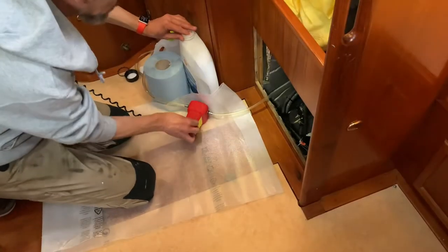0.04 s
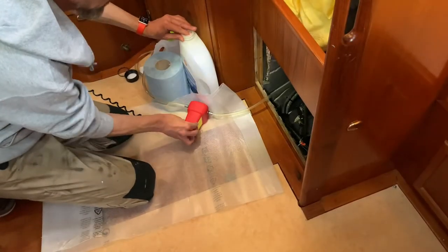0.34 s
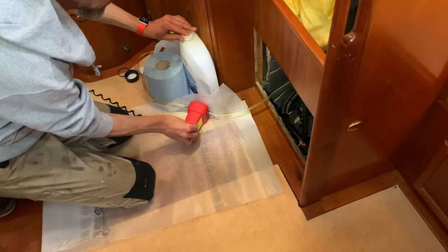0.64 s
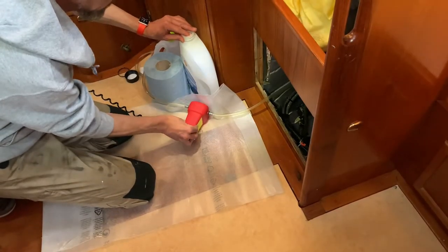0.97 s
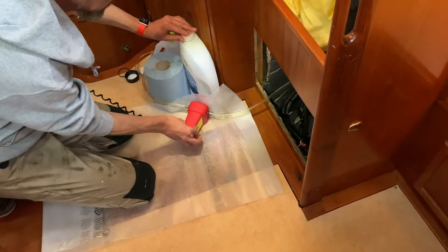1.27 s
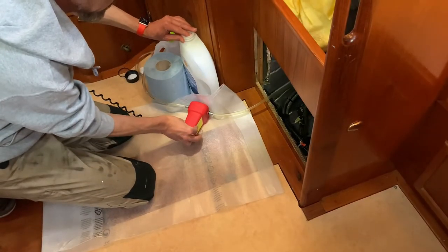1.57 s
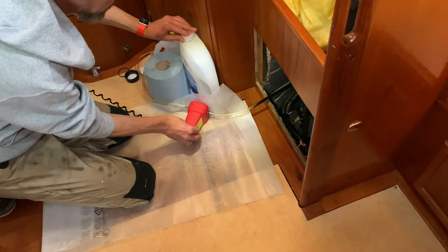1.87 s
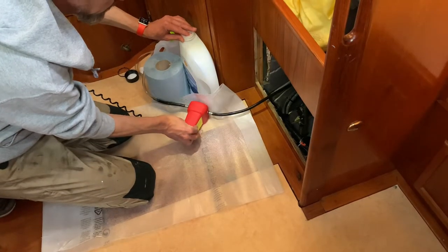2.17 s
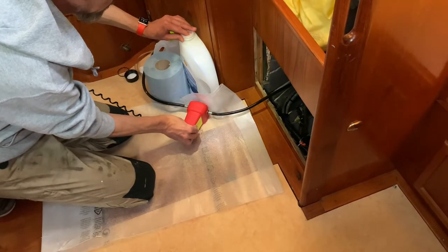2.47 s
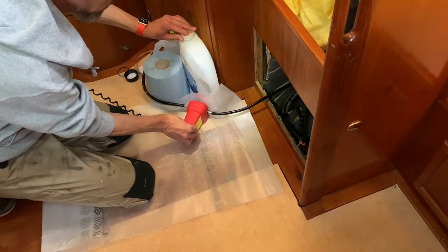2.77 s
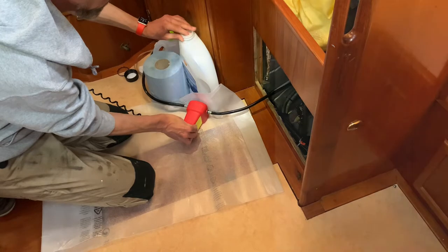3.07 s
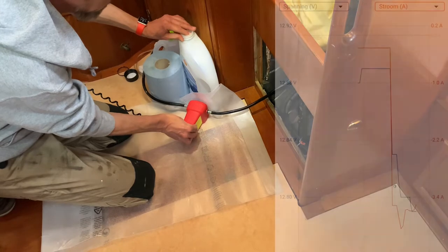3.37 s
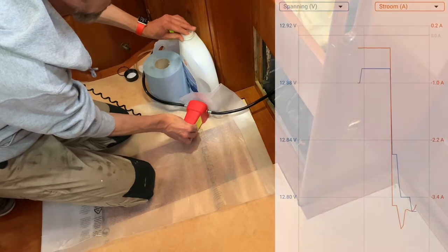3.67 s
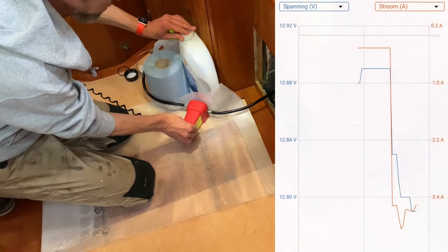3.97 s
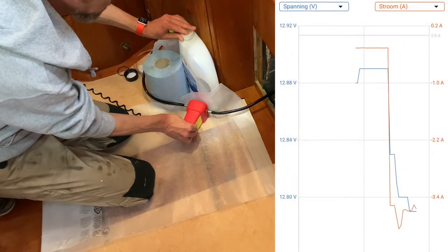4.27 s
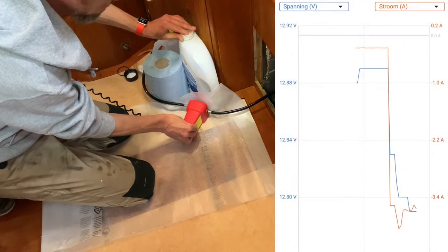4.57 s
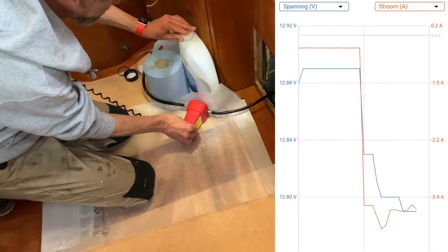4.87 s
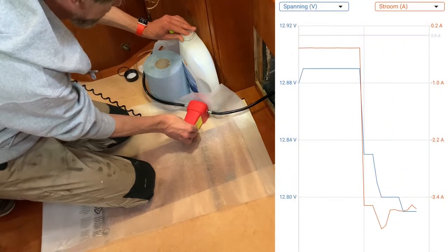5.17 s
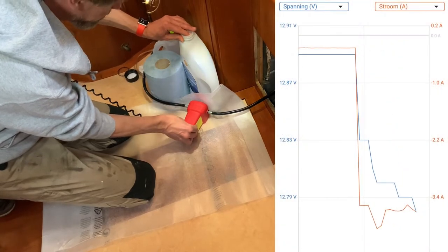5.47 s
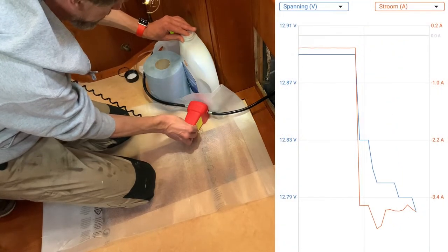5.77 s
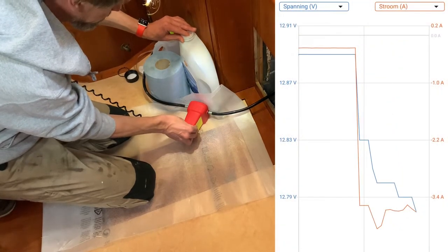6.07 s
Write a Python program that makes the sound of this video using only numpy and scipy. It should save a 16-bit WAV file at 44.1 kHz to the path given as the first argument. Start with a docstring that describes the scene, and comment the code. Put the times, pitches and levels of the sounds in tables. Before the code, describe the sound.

A small geared pump is heard from about a metre away in a quiet wooden boat cabin. It clicks on and buzzes dry for a second, then catches oil, spitting and hissing as it slows to a lower note. The foam gradually clears and the last air gurgles out of the tube, leaving a steady, pulsing hum with whining, rattling gears over a faint low hull rumble.

```python
"""A small geared oil pump, about a metre from a phone's two microphone ports in a boat's wooden cabin.
Switched on, it spins up and buzzes dry for a second, then gulps its first oil: the speed sags, and
three strokes a turn thud into the tube, ring the casing and squirt a foam that slowly clears.
The gears whine and clatter throughout. Behind them lie a low hull rumble and quiet cabin air."""
import sys
import numpy as np
from scipy import signal
from scipy.fft import rfft, irfft
from scipy.io import wavfile
from scipy.ndimage import uniform_filter1d

SR = 44100
rng = np.random.default_rng(int(sys.argv[2]) if len(sys.argv) > 2 else 0)


def wrap_up_sound(samples):
    """Save the sound to the file named by the first command line argument, as 16-bit audio."""
    columns = np.atleast_2d(samples).T
    # keep every value between -1 and 1, then stretch to whole-number steps
    tamed = np.clip(columns, -1, 1)
    steps = np.round(tamed * 32767).astype(np.int16)
    wavfile.write(sys.argv[1], SR, steps)


N = 270333
TIME = np.arange(N) / SR
BINS = np.arange(N // 2 + 1) * SR / N
ON_S, PRIMED_S, TUBE_FULL_S, THROB_S = 1.119, 2.054, 3.06, 5.14
FILL_S, FOAM_CLEAR_S = 0.4, 0.46
STROKES_PER_TURN, WHEEL_TEETH, PINION_TEETH = 3, 50, 12
KNOCK_LAG = 1.2  # a knock arrives treble first: group delay at harmonic k is KNOCK_LAG / k strokes


def pump(strokes, hz):
    """The strokes buzz while dry, then thud, ring and churn in oil; late on they soften and throb."""
    primed, throbbing = ramp(PRIMED_S - .02, 0.011), ramp(THROB_S, 0.033)
    air_left = 1 - primed + 0.2 * primed * (1 - ramp(2.85, 0.28))
    gurgle = swell(3.12, 0.34)  # the last air leaves the tube
    uneven = undb(1.3 * gurgle * walk(110))
    knocks = thuds(strokes, hz) * undb(-2 * throbbing) + casing_ring(strokes, hz, gurgle)
    wet = uneven * knocks + churn(strokes, gurgle) + growl(strokes) * throbbing
    return dry_buzz(strokes) * air_left - wet * primed - tube(strokes)


# Running speed, sagging under the oil. Each row: time in seconds, strokes a second.
RUNNING_SPEED = [(1.3, 116.4), (1.75, 118.8), (2.33, 119.8), (2.62, 107.9), (2.83, 100.8), (3.1, 100.7),
                 (3.45, 99.1), (3.8, 101.8), (4.45, 102.5), (4.95, 104.2), (6.13, 106.6)]

def stroke_rate():
    """The motor runs up from rest; the first slug of oil brakes it faster than it recovers."""
    since_gulp = TIME - 2.065
    brake_hz = 9.5 * np.exp(-np.abs(since_gulp) / np.where(since_gulp < 0, .03, .06))
    return curve(RUNNING_SPEED) * (1 - settle(ON_S, .026)) - brake_hz


# The empty pump's hollow tone. Each row: multiple of the stroke rate, relative level in dB.
BUZZ_HARMONICS = [(3, -15), (4, -13), (5, -1.5), (7, -14), (8, -1.5), (10, -1), (11, -5), (13, -7.5),
                  (14, -11)]

def dry_buzz(strokes):
    """With no oil to cushion it the rotor shakes; the buzz swells, then holds."""
    buzz = unit(partials(strokes + .002 * walk(150), BUZZ_HARMONICS, waver_db=.8, waver_hz=40))
    wobble = 1 + .1 * np.cos(2 * np.pi * strokes / STROKES_PER_TURN)
    return buzz * wobble * undb(-25.3 - 16 * np.maximum(1.83 - TIME, 0))


# Spells where the thud swells and the casing ring rises or fades.
# Each row: middle and half length in seconds, change of thud and change of ring in dB.
KNOCK_SWELLS_AND_DIPS = [(2.74, 0.17, 0, -3.5), (2.995, 0.12, 5.5, 0.5), (3.307, 0.125, 10, 0.5),
                         (3.688, 0.041, 2.5, -7), (4.52, 0.34, 4, 1.5)]

def knock_changes_db():
    """Brief, smooth changes in the level of the thud and of the casing ring."""
    return sum(np.outer([thud, ring], swell(s, length))
               for s, length, thud, ring in KNOCK_SWELLS_AND_DIPS)


# The loaded stroke's low end. Each row: multiple of the stroke rate, relative level in dB.
THUD_HARMONICS = [(3, 0), (4, -1)]

def thuds(strokes, hz):
    """Low harmonics of the strokes, each booming where it meets the floorboards' resonance."""
    board_hz, board_width_hz = 407.7, 18
    change_db, _ = knock_changes_db()
    out = 0
    for k, db in THUD_HARMONICS:
        boom_db = 8.5 / (1 + ((k * hz - board_hz) / (board_width_hz / 2)) ** 2)
        dip_db = -18 * swell(3.54, 0.035) * (k == 4)  # the upper harmonic dips briefly
        tone = partials(strokes, [(k, db - 3)], waver_db=.8, waver_hz=7, scatter=.15, lag=KNOCK_LAG)
        out += tone * undb(boom_db + dip_db)
    return out * undb(flow_db(clear_db=-35.5, foam_db=3.9, empty_cut_db=21) + change_db)


# The casing's resonances. Each row: centre in Hz, width in Hz, relative level in dB.
CASING_MODES = [(540, 36, 5), (611, 18, 0.5), (715, 70, 1.5), (844, 34, -2), (924.5, 15, 3), (954, 11, 5),
                (993, 15, -0.5), (1280, 34, -2)]

def casing_ring(strokes, hz, gurgle):
    """Each stroke knocks the casing; its harmonics swell and fade as they cross the modes."""
    staggered = strokes + (.002 + .004 * gurgle + .008 * foam()) * walk(90)
    lift = 1 + 0.057 * foam() * (1 - ramp(2.65, .2))  # foam is lighter than oil, so the modes rise
    ring = 0
    for k in range(5, 14):
        gain = sum(undb(db) / (1 + 2j * (k * hz - mode * lift) / width)
                   for mode, width, db in CASING_MODES)
        phase = 2 * np.pi * (k * staggered - KNOCK_LAG * np.log(k)) + .2 * walk(3)
        waver_db = 1.5 * walk(8) + 3.5 * foam() * np.tanh(walk(35))
        ring += np.real(gain * np.exp(1j * phase)) * undb(waver_db)
    _, change_db = knock_changes_db()
    level_db = flow_db(clear_db=-33, foam_db=3.5, empty_cut_db=5) - 2 * ramp(THROB_S - .2, .3)
    return unit(ring) * undb(level_db + change_db)


# Oil churning in the pump. Each row: frequency in Hz, relative noise density in dB.
CHURN_SPECTRUM = [(90, -41), (170, -14), (250, -4.5), (370, 4.5), (700, 4), (1000, 9), (1400, -51),
                  (3000, -54)]

def churn(strokes, gurgle):
    """Each stroke sloshes the oil, louder while it gurgles."""
    slosh = noise(0.036) * burst(strokes, decay=0.33, floor=0.12, scatter_db=4)
    level_db = flow_db(clear_db=-42, foam_db=2.5, empty_cut_db=1.7) + 7.7 * gurgle
    return colour(slosh, CHURN_SPECTRUM) * undb(level_db)


# The throb's tones. Each row: multiple of the pattern's rate, level in dB.
GROWL_HARMONICS = [(3, -55), (9, -54), (16, -53), (19, -44), (20, -49), (22, -45), (23, -47), (36, -51)]

def growl(strokes):
    """The strokes repeat in a pattern of six, which puts a low growl between their harmonics."""
    return partials(strokes / 6, GROWL_HARMONICS, waver_db=1, waver_hz=8)


# The first gulps shake the tube. Each row: middle and half length in seconds, level in dB.
OIL_GULPS = [(2.13, 0.12, -41), (2.326, 0.071, -36), (2.612, 0.078, -46)]

def tube(strokes):
    """The tube pulses with the strokes; its octave hoots while empty, then surges and settles once full."""
    gulps = sum(undb(db) * swell(s, length) for s, length, db in OIL_GULPS)
    hoot = undb(-29 - 36.5 * np.maximum(1.795 - TIME, 0)) * (1 - ramp(PRIMED_S - .05, 0.12))
    full = undb(-46 + 17.5 * settle(TUBE_FULL_S, 0.5)) * ramp(TUBE_FULL_S - .02, 0.15)
    pulse = np.cos(2 * np.pi * strokes) * (undb(-49) + gulps + 0.096 * (hoot + full))
    octave = np.cos(2 * np.pi * (2 * strokes - KNOCK_LAG * np.log(2)))
    return np.sqrt(2) * (pulse + octave * (hoot + undb(-43.5) * foam() + full))


def foam():
    """Air in the oil, 0-1: it builds while the pump fills, then clears."""
    return ramp(PRIMED_S, FILL_S) * settle(PRIMED_S + FILL_S, FOAM_CLEAR_S)


def flow_db(clear_db, foam_db, empty_cut_db):
    """Level of a sound the oil drives: raised by foam, cut until the pump fills."""
    return clear_db + foam_db * foam() - empty_cut_db * (1 - ramp(PRIMED_S, FILL_S))


def gearbox(strokes):
    """The motor's pinion drives the pump wheel; the teeth knock about when the speed changes quickly."""
    wheel = strokes / STROKES_PER_TURN
    acceleration = uniform_filter1d(np.gradient(np.gradient(strokes)), size=1500) * SR ** 2
    play = 0.000081 + 0.00075 * np.tanh(np.abs(acceleration) / 130)
    catching = settle(ON_S + .03, .07)  # the teeth skip until the motor is up to speed
    teeth = wheel + play * walk(220) + .003 * catching ** 2 * walk(400)
    loaded = ramp(2.54, 0.26)
    unoiled = ramp(ON_S + .02, .08) * (1 - ramp(1.95, .4))
    mesh = whine(teeth, wheel, catching, loaded) + strain(teeth) * loaded
    friction = (squeal(teeth, wheel) + rasp(strokes)) * unoiled
    return mesh + friction + clatter(strokes, wheel, unoiled) + motor_hum(wheel, unoiled)


# The mesh tone and its sidebands. Each row: multiple of the wheel rate, relative level in dB.
MESH_TONES = [(47, -21), (48, -22), (50, 0)]
# The whine's rise and fall. Each row: time in seconds, relative level in dB.
WHINE_LEVEL = [(1.14, -28), (1.2, -24.5), (1.46, -33), (1.8, -26.5), (2.52, -32), (2.76, -27),
               (2.85, -21.5), (3.5, -28), (3.72, -25), (3.82, -39), (4.02, -38), (4.08, -32), (4.35, -33.5),
               (4.45, -30), (4.7, -30.5), (5.25, -37.5), (5.78, -30), (6.1, -37)]

def whine(teeth, wheel, catching, loaded):
    """Meshing teeth whine; they stutter once a turn at first and flutter until the load holds them."""
    slack = (1 - loaded) * (1 - .35 * swell(1.82, .2))
    flutter = undb(slack * (4.2 * np.tanh(walk(150)) - 1.2))
    stutter = 1 + .7 * catching * np.cos(2 * np.pi * wheel)
    mesh = unit(partials(teeth, MESH_TONES, waver_db=.7, waver_hz=50))
    return mesh * flutter * stutter * undb(curve(WHINE_LEVEL) - 0.43)


# The gears under load. Each row: multiple of the wheel rate, relative level in dB.
STRAIN_TONES = [(45, -52), (47, -52), (64, -50), (65, -42.5), (66, -51), (100, -48)]

def strain(teeth):
    """Loaded gears add a whine that swells with the thud."""
    thud_db, _ = knock_changes_db()
    tones = partials(teeth + .0018 * walk(160), STRAIN_TONES, waver_db=1.8, waver_hz=90)
    return tones * undb(1.5 + 0.5 * thud_db + 1.6 * walk(9))


# The gears without oil. Each row: multiple of the wheel rate, relative level in dB.
SQUEAL_TONES = [(31, -41), (49, -47), (52, -47), (59, -44), (100, -40), (133, -45), (150, -42)]

def squeal(teeth, wheel):
    """Dry teeth squeal in an uneven flutter."""
    tones = partials(teeth + .001 * walk(330), SQUEAL_TONES, waver_db=2.5, waver_hz=90)
    each_turn = 1 + .4 * np.cos(2 * np.pi * wheel + .8 * walk(30))
    return tones * each_turn * undb(4 * np.tanh(walk(130)))


# Dry teeth rubbing. Each row: frequency in Hz, relative noise density in dB.
RASP_SPECTRUM = [(600, 1.5), (1100, 4), (2400, 4), (3200, -2), (4800, -2), (6000, -6), (7200, -9.5),
                 (8500, -37), (15000, -28)]

def rasp(strokes):
    """Dry teeth rasp at every stroke."""
    scrapes = noise(.5) * burst(strokes, decay=.5, floor=.5, scatter_db=6)
    return colour(scrapes, RASP_SPECTRUM) * undb(-36.5)


# Gear clatter from a metre off. Each row: frequency in Hz, relative noise density in dB.
CLATTER_SPECTRUM = [(30, -50), (100, -16.5), (300, 0), (600, 2), (1050, -6.5), (1250, 4), (1420, -18),
                    (1640, 4.5), (1850, 1.5), (2200, 0.5), (4500, -10), (6000, -13), (7000, -86),
                    (9500, -9), (15500, -26)]

def clatter(strokes, wheel, unoiled):
    """The same worn flanks come round on every turn, clattering harder in the foam."""
    flanks = rng.standard_normal((3, 1024))
    worn = unit(np.array([np.interp(wheel % 1 * 1024, np.arange(1024), flank) for flank in flanks]))
    knocks = spread(worn, .8) + .7 * noise(.8)
    rattle = knocks * burst(strokes, decay=.5, floor=.42, scatter_db=7)
    return colour(rattle, CLATTER_SPECTRUM) * undb(-33 + 5 * foam() - unoiled)


# The motor's hum and its extra tones when unloaded. Each row: multiple of the shaft rate, level in dB.
HUM_TONES = [(2, -55), (4, -44)]
UNLOADED_TONES = [(4, -44), (10, -42), (13, -43)]

def motor_hum(wheel, unoiled):
    """The motor hums with its shaft and sings louder before the oil loads it."""
    shaft = wheel * WHEEL_TEETH / PINION_TEETH
    hum = partials(shaft, HUM_TONES, waver_db=1.8, waver_hz=11)
    return hum + partials(shaft + .004 * walk(100), UNLOADED_TONES, waver_db=2, waver_hz=30) * unoiled


# Fine bubbles at the outlet. Each row: frequency in Hz, relative noise density in dB.
FIZZ_SPECTRUM = [(3000, -21.5), (6000, -15), (8000, -7), (10000, -2.5), (15500, -3.5)]

def spray(strokes):
    """Oil and air squirt out at each stroke as tiny bursting bubbles; the first froth is coarser."""
    bubbles = noise(.11) * undb(2.8 * walk(2500))
    squirts = bubbles * burst(strokes, decay=.27, floor=.38, scatter_db=3.5)
    fizz = colour(squirts, FIZZ_SPECTRUM) * undb(flow_db(clear_db=-25, foam_db=3.7, empty_cut_db=23))
    splutter = noise(0.17) * burst(strokes, decay=1.0, floor=1.7, scatter_db=11)
    froth = colour(splutter, [(400, -16), (1500, 10), (5500, 11.5), (9000, 4), (15000, -46)])
    froth *= undb(flow_db(clear_db=-39, foam_db=14.1, empty_cut_db=0))
    return (fizz + froth) * ramp(PRIMED_S, 0.087)


# Air in the tube. Each row: middle in seconds, pitch in Hz, level in dB.
AIR_POCKETS = [(2.66, 222, -44), (3.141, 620, -32)]

def air_pockets():
    """Pockets of air slip through the tube; each rings briefly and unsteadily."""
    out = 0
    for s, hz, db in AIR_POCKETS:
        tone = np.sqrt(2) * np.cos(2 * np.pi * hz * TIME + .5 * walk(120))
        out += tone * undb(db) * swell(s, .028)
    return out


# Small sounds at the pump. Each row: start in seconds, level in dB, centre in Hz, decay in seconds.
CLICKS_AND_SPITS = [(.425, -69, 9000, 0.024), (.54, -61, 7440, 0.018), (1.001, -63.5, 650, 0.032),
                    (1.117, -30, 10100, 0.023), (1.117, -38.5, 980, 0.1), (1.141, -25.5, 1040, 0.016),
                    (1.15, -33, 2700, 0.018), (1.245, -37.5, 9000, 0.03), (2.03, -28.5, 9350, 0.029)]

def clicks():
    """Fingers on the pump, the switch snapping shut, the gears catching, and the first spits of oil."""
    out = 0
    for s, db, hz, decay in CLICKS_AND_SPITS:
        tick = colour(noise(0.013), [(hz / 8, -12), (hz, 0), (hz * 3, -20), (hz * 8, -45)])
        out += tick * undb(db) * ramp(s, 0.0002) * settle(s, decay)
    return out


# The hull before the pump starts. Each row: time in seconds, level in dB.
HULL_LEVEL = [(0.452, -68), (0.48, -61), (0.884, -64), (0.994, -75), (1.1, -53)]

def hull_rumble():
    """A low rumble in the hull, which the pump kicks once and then keeps shaking."""
    rumble = colour(noise(.06), [(25, -42), (42, -27), (55, -1), (80, -4), (130, -20), (300, -50)])
    running = ramp(ON_S, .03)
    kick = undb(-44) * swell(1.24, 0.027)
    return rumble * (undb(curve(HULL_LEVEL)) * (1 - running) + undb(-56.5) * running + kick)


# Room tone in the wooden cabin. Each row: frequency in Hz, relative noise density in dB.
ROOM_TONE = [(25, -37), (65, -10), (130, -3.5), (250, -11.5), (700, -16), (1500, -24), (4000, -29),
             (15000, -36)]

def cabin_air():
    """Quiet air all round the microphone."""
    return colour(noise(0.47), ROOM_TONE) * undb(-73)


def undb(db):
    """Decibels to gain."""
    return 10 ** (np.asarray(db) / 20)


def unit(x):
    """Scale to an rms of 1."""
    return x / np.sqrt(np.mean(x ** 2))


def curve(points):
    """Join (seconds, value) points with straight lines."""
    return np.interp(TIME, *np.transpose(points))


def ramp(start_s, rise_s):
    """A straight rise from 0 to 1."""
    return np.clip((TIME - start_s) / rise_s, 0, 1)


def swell(middle_s, half_length_s):
    """A smooth rise and fall, 1 at its middle."""
    return np.exp(-((TIME - middle_s) / half_length_s) ** 2)


def settle(start_s, decay_s):
    """1 until the start, then dying away."""
    return np.exp(-np.maximum(TIME - start_s, 0) / decay_s)


def response(points):
    """Gain at every frequency from (Hz, dB) points."""
    hz, db = np.transpose(points)
    return undb(np.interp(np.log(BINS + 1), np.log(hz), db))


def colour(x, points):
    """Filter x by (Hz, dB) points, to an rms of 1."""
    return unit(irfft(rfft(x) * response(points), N))


def walk(hz):
    """Random levels held 1 / hz seconds and smoothed twice; spread near 1."""
    hold = max(int(SR / hz), 1)
    steps = np.repeat(rng.standard_normal(N // hold + 1), hold)
    return 1.3 * uniform_filter1d(uniform_filter1d(steps, hold), hold)[:N]


def spread(three, diffuse):
    """One direct sound for both channels and a reflected one for each, with power share diffuse."""
    return np.sqrt(1 - diffuse) * three[0] + np.sqrt(diffuse) * three[1:]


def noise(diffuse):
    """Stereo white noise."""
    return spread(rng.standard_normal((3, N)), diffuse)


def partials(cycles, orders, waver_db, waver_hz, scatter=2, lag=0):
    """Wavering tones locked to a rotation; reflections scatter their phases (radians)."""
    out = 0
    for k, db in orders:
        phase = 2 * np.pi * (k * cycles - lag * np.log(k)) + scatter * rng.standard_normal()
        out += np.sqrt(2) * undb(db + waver_db * walk(waver_hz)) * np.cos(phase)
    return out


def burst(strokes, decay, floor, scatter_db):
    """An envelope that jumps by a random amount at each stroke and dies away; decay is in strokes."""
    strength = undb(scatter_db * (2 * rng.random(1024) - 2.5))[strokes.astype(int)]
    envelope = (floor + strength * np.exp(-(strokes % 1) / decay)) * (strokes > 0)
    return unit(uniform_filter1d(envelope, size=24))


def scene():
    """One rotation drives the pump, its gears and the spray; the machine fades in as it spins up."""
    hz = stroke_rate()
    strokes = np.cumsum(hz) / SR
    machine = pump(strokes, hz) + gearbox(strokes) + spray(strokes) + air_pockets()
    return machine * (1 - settle(ON_S, 0.021)) + clicks() + hull_rumble() + cabin_air()


# Phase between the phone's ports. Each row: frequency in Hz, left's lead in radians.
LEFT_LEAD = [(0, 0), (700, .9), (1570, 1.4), (1650, -2.5), (1685, -2), (1725, .9), (1980, .6), (2200, 1.6),
             (5700, 2.2), (6500, 0), (7800, -2.8), (9000, -3.6), (10500, -6.28), (11600, -6.28),
             (15200, -12.57)]
# Balance between the ports. Each row: frequency in Hz, left minus right in dB.
LEFT_BALANCE = [(110, -3), (240, -1), (330, 0.5), (550, 2.5), (1000, 0.5), (1600, 7.5), (2000, 0),
                (6000, 0)]

def record(dry):
    """A phone about a metre from the pump: its ports differ in phase and level, and the top is cut."""
    lead = np.interp(BINS, *np.transpose(LEFT_LEAD))
    left = np.exp(1j * lead / 2) * np.sqrt(response(LEFT_BALANCE))
    impulses = irfft(np.array([left, 1 / left]), N)
    taps = np.roll(impulses, 1024, axis=1)[:, :2049] * np.hanning(2049)
    ports = signal.fftconvolve(dry, taps, mode="same", axes=1)
    return signal.sosfilt(signal.ellip(10, .2, 80, 15800, fs=SR, output="sos"), ports)


dry = scene()
out = record(dry)
wrap_up_sound(out)
```